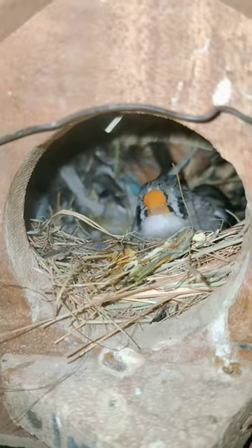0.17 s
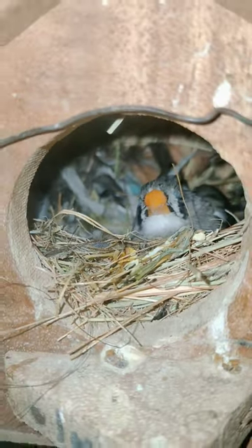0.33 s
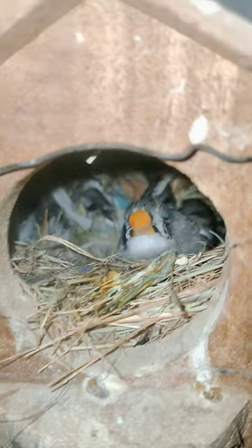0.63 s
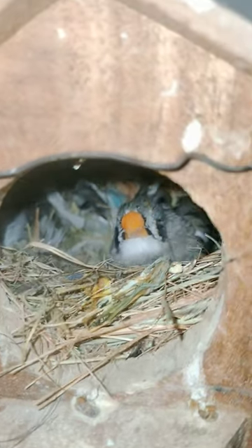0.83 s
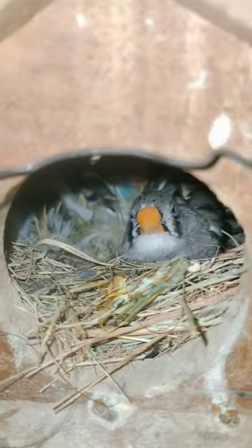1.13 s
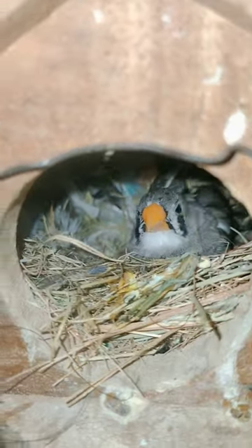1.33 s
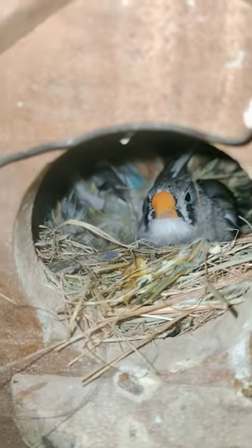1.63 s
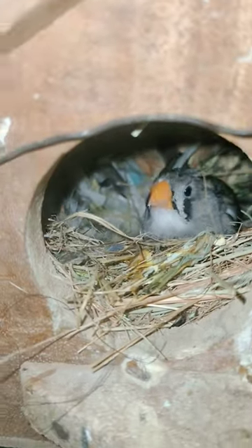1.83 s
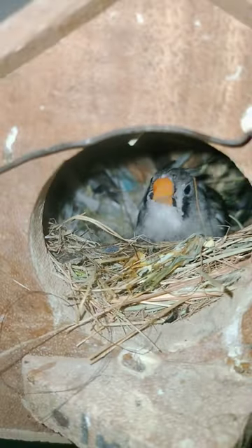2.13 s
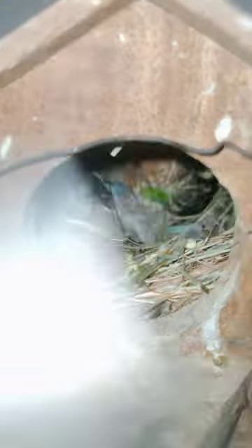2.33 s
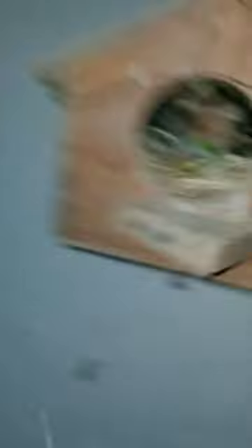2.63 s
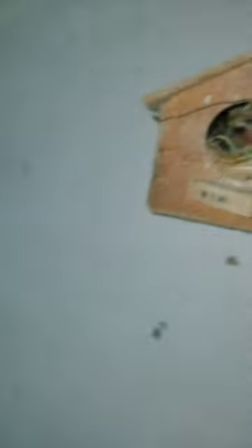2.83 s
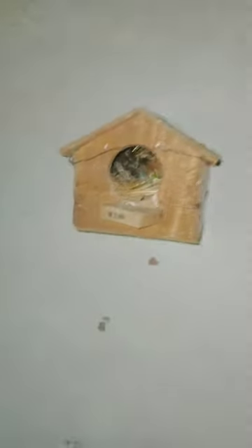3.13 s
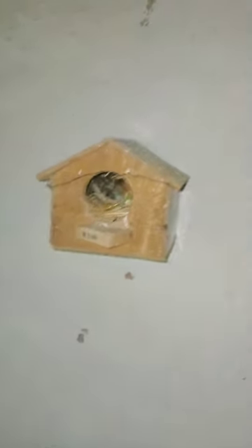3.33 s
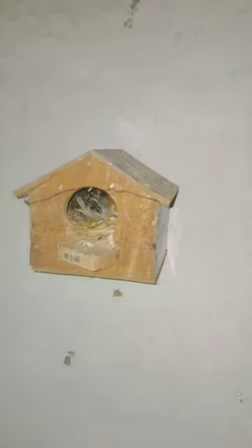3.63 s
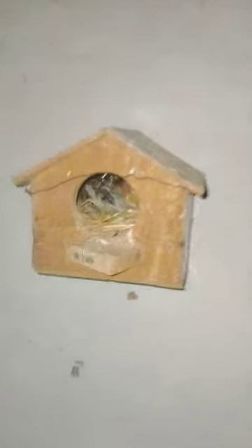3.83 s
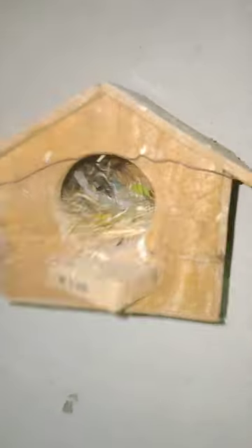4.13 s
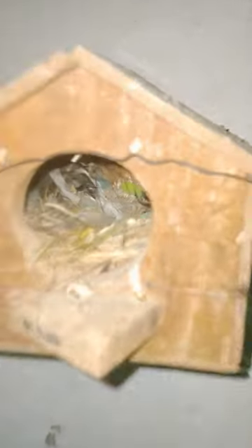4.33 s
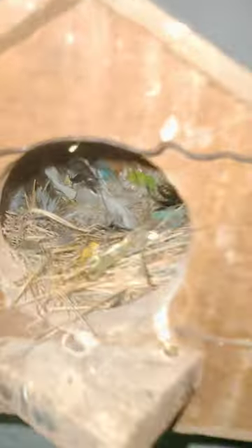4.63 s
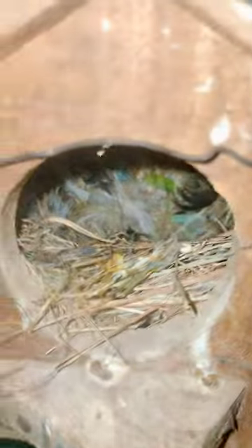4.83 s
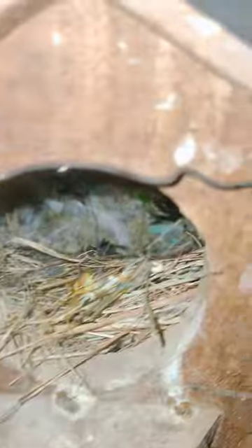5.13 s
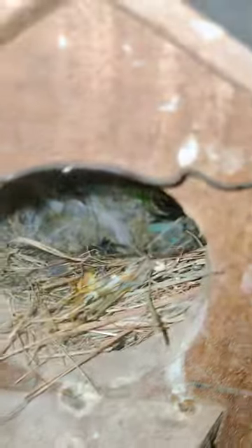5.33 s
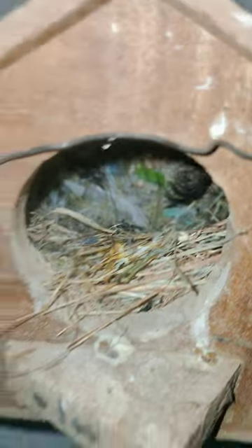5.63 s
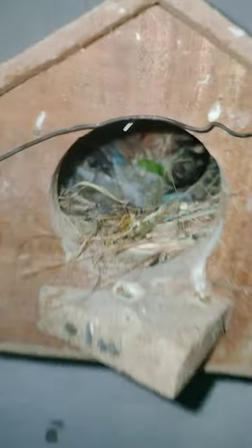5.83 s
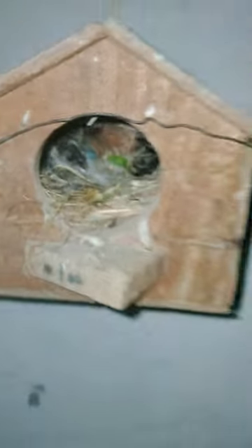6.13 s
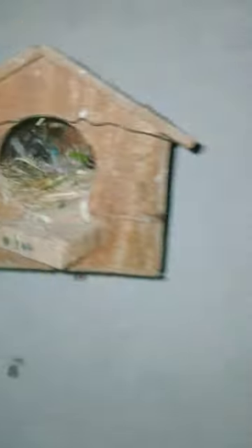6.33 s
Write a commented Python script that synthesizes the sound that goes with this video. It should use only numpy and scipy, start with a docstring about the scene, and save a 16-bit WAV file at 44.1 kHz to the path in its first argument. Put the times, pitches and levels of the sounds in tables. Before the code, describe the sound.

From the start, finches chirp close to the microphone in short, high, buzzy calls, about eight a second, with reedy chatter from other birds behind them. The hard walls of a small enclosure add a brief echo. A soft low puff of air comes near 0.9 seconds. At about 2.2 seconds there is one sharp knock, like claws striking a wooden nest box, with a few soft puffs, perhaps wingbeats, until 2.6 seconds. The close chirping stops around 2.8 seconds. From 3 seconds to the end at about 6.5 seconds, fainter birds keep up scattered chirps and short, hoarse, mostly falling whistles, with one louder close chirp near 3.9 seconds. Underneath runs a low outdoor rumble that eases in the second half, along with a faint high hiss and a few very faint low hums.

```python
"""Finches in a small enclosure

Close finches give buzzy chirps: the syrinx is the source and the resonances of the beak are the filter.
Further birds chatter and whistle hoarse glides, blurred by reflections from the hard walls.
A wooden knock and soft low puffs of air, perhaps from wings, sound over a low outdoor rumble."""
import sys
import numpy as np
from scipy import signal
from scipy.fft import rfft, irfft, next_fast_len
from scipy.io import wavfile
from scipy.ndimage import uniform_filter1d

SR = 44100
rng = np.random.default_rng(int(sys.argv[2]) if len(sys.argv) > 2 else 0)


def master(y):
    """Save y as 16-bit WAV."""
    cut = np.clip(np.atleast_2d(y).T, -1, 1)
    pcm = np.round(cut * 32767)  # scale
    wavfile.write(sys.argv[1], SR, pcm.astype(np.int16))


N = 286120


def gain_of(db):
    """Decibels to amplitude ratio."""
    return 10 ** (np.asarray(db) / 20)


def unit_rms(x):
    """Normalisation to unit mean power."""
    return x / np.sqrt(np.mean(x ** 2) + 1e-20)


def value_at(points, hz):
    """Interpolation on a logarithmic frequency axis."""
    f, value = np.transpose(points)
    return np.interp(np.log(hz + 1), np.log(f + 1), value)


def colour(x, points):
    """Zero-phase filtering by a curve of (Hz, dB) points."""
    size = next_fast_len(len(x))
    response = gain_of(value_at(points, np.fft.rfftfreq(size, 1 / SR)))
    return irfft(rfft(x, size) * response, size)[:len(x)]


def add(mix, start, sound):
    """Superposition of a sound at a start time in seconds."""
    part = mix[round(start * SR):][:len(sound)]
    part += sound[:len(part)]


def resonate(x, hz, width_hz):
    """A movable resonance by heterodyning: shift to zero frequency, smooth twice, shift back."""
    carrier = np.exp(2j * np.pi * np.cumsum(hz * np.ones(len(x))) / SR)
    r = np.exp(-np.pi * width_hz / SR)
    return 2 * (carrier * signal.lfilter([(1 - r) ** 2], [1, -2 * r, r * r], x / carrier)).real


def wobble(size, samples):
    """Low-pass noise: a smooth random drift of rms 1."""
    return unit_rms(uniform_filter1d(uniform_filter1d(rng.standard_normal(size), samples), samples))


def rumble():
    """Band-limited noise: three bands of outdoor rumble share an envelope and drift apart in level."""
    # Each row: frequency in Hz, relative level in dB.
    spectrum = [(12, -59), (20, -26.5), (50, -26.5), (100, -1), (160, 13.5), (260, -3.5), (430, 2),
                (700, -12.5), (1000, -13.5), (1500, -29.5)]
    # Each row: time in seconds, level in dB.
    envelope = [(0, -44), (.78, -37.5), (.99, -40), (1.99, -45.5), (2.6, -40.5), (2.95, -46), (3.79, -52.5),
                (4.73, -48.5), (4.93, -53), (6.07, -55.5), (6.49, -54)]
    # Low, middle and upper band. Each row: offset in dB, drift in dB per second.
    bands = [(3.5, -0.1), (2.5, 0.59), (-5, 0.66)]
    t, out = np.arange(N) / SR, np.zeros(N)
    noise = colour(rng.standard_normal(N), spectrum)
    level_db = np.interp(t, *np.transpose(envelope))
    for edges_hz, (db, drift) in zip([(15, 130), (130, 450), (450, 1100)], bands):
        band = signal.sosfilt(signal.butter(2, edges_hz, "bandpass", fs=SR, output="sos"), noise)
        out += gain_of(level_db + db + drift * t) * unit_rms(band)
    return out


def hum():
    """Exponential decay: faint, wavering low tones fade as they sound."""
    # Each row: start in seconds, length in seconds, frequency in Hz, level in dB.
    tones = [(1.1, 1, 106, -43), (2.78, 0.54, 195, -45), (4.3, 0.67, 106.4, -55), (0.552, .4, 429, -53),
             (1.621, .2, 384, -53), (4.15, .17, 609, -55), (4.919, 0.32, 240, -54)]
    out, fade_db = np.zeros(N), -12
    for start, length, hz, db in tones:
        t = np.arange(0, length, 1 / SR)
        pitch_hz = hz * (1 + .014 * wobble(len(t), 3000))
        tone = np.sqrt(2) * np.sin(2 * np.pi * np.cumsum(pitch_hz) / SR)
        add(out, start, gain_of(db + fade_db * t / length) * tone * signal.windows.tukey(len(t), .3))
    return out


def far_flock():
    """Incoherent summation: a far flock blurs into a steady hiss, made here as shaped noise."""
    # Each row: frequency in Hz, relative level in dB.
    spectrum = [(900, -55.5), (1500, 6), (3000, -0.5), (4300, -4.5), (5200, 23), (5800, 29), (6500, 24.5),
                (7400, 6), (8000, -20)]
    return gain_of(-56) * unit_rms(colour(rng.standard_normal(N), spectrum))


def walls(x):
    """Reverberation of the enclosure: four random decaying tails crossfade in turn so it stays smooth."""
    # Each row: frequency in Hz, time to decay by 60 dB in seconds.
    decay_times = [(500, 0.59), (1500, 0.16), (3000, 0.39), (5000, 0.36), (8000, 0.27)]
    cycle, out = 2 * np.pi * 1.2 * np.arange(N) / SR, np.zeros(N)
    for turn in range(4):
        taps = np.zeros(SR // 2)
        slots = np.arange(260, len(taps) - 20, 20)
        taps[slots + rng.integers(0, 20, len(slots))] = rng.choice([-1., 1.], len(slots))
        hz, t, bands = signal.stft(taps, SR, nperseg=256)
        decay = gain_of(-60 * t / value_at(decay_times, hz)[:, None])
        tail = signal.istft(bands * decay, SR, nperseg=256)[1]
        share = np.maximum(np.cos(cycle - turn * np.pi / 2), 0)
        out += signal.fftconvolve(x * share, tail / np.linalg.norm(tail))[:N]
    return out


def syrinx(hz, breath):
    """The voice source: periodic vibration gives a harmonic series, mixed with breath noise."""
    turns = np.cumsum(hz) / SR
    harmonics = sum(np.cos(2 * np.pi * k * turns) * (k * hz < 9000) for k in range(1, 16))
    return (1 - breath) * unit_rms(harmonics) + breath * rng.standard_normal(len(hz))


def chatter():
    """Source and filter: reedy calls too far to tell apart pass through one drifting beak resonance."""
    # Each row: time in seconds, vocal effort in dB.
    effort = [(0, -26.5), (.32, -41), (.96, -32.5), (1.15, -58), (1.25, -32.5), (1.82, -36), (2.09, -27),
              (2.22, -33.5), (2.491, -39), (2.73, -26.5), (3.07, -47.5), (3.36, -34), (3.962, -38.5),
              (4.19, -47), (4.41, -32), (4.84, -45.5), (5.1, -29), (5.4, -47.5), (5.96, -32.5),
              (6.49, -53.5)]
    effort_db = np.interp(np.arange(N) / SR, *np.transpose(effort))
    beak_hz = 2116 + 37.5 * (effort_db + 30.5)  # louder birds open wider
    source = syrinx(640 * (1 + .08 * wobble(N, 2500) + .01 * wobble(N, 200)), breath=.75)
    flutter_db = 3 * wobble(N, 900)
    return gain_of(effort_db + flutter_db) * unit_rms(resonate(source, beak_hz, 1520))


def whistle(length, db, first_hz, last_hz):
    """Jitter and shimmer: random modulation of pitch and level makes a breathy glide hoarse."""
    # Each row: first pitch of the note in Hz, level of its octave against the fundamental in dB.
    octave = [(1000, -10), (1300, 4.5), (1800, -18), (2500, -31.5), (3600, -3), (5000, -25)]
    size = int(length * SR)
    glide_hz = first_hz * (last_hz / first_hz) ** np.linspace(0, 1, size)
    hz = glide_hz * (1 + .027 * wobble(size, 200))
    phase = 2 * np.pi * np.cumsum(hz) / SR
    tone = np.sin(phase) + gain_of(value_at(octave, first_hz)) * np.sin(2 * phase)
    breath = unit_rms(resonate(rng.standard_normal(size), hz, 570))
    shimmer = gain_of(db + 3.6 * wobble(size, 150))
    return shimmer * (tone + .54 * breath) * signal.windows.tukey(size, .35)


def box_knocks():
    """Modal ringing: claws strike a wooden nest box and excite its damped modes."""
    # Each row: time in seconds, gain in dB.
    knocks = [(2.221, -7), (2.276, -34)]
    # Each row: frequency in Hz, relative level in dB, time to decay by 60 dB in seconds.
    modes = [(300, -26, .012), (1100, -15, .01), (2000, 0, .009), (3400, -12, .004), (4900, -5, .004),
             (6800, -8, .004)]
    # The small box radiates little bass. Each row: frequency in Hz, gain in dB.
    radiation = [(150, -24), (900, 0)]
    out, t, lead_s = np.zeros(N), np.arange(3000) / SR, .01
    ring = sum(gain_of(db - 60 * t / t60) * np.sin(2 * np.pi * hz * t) for hz, db, t60 in modes)
    knock = colour(np.pad(ring, (round(lead_s * SR), 0)), radiation)
    for start, db in knocks:
        add(out, start - lead_s, gain_of(db) * knock)
    return out


def air_puffs():
    """Air displacement: soft puffs of low noise reach the microphone, perhaps from wings."""
    # Each row: start in seconds, level in dB, length in seconds.
    puffs = [(.899, -37, 0.061), (2.234, -22, 0.0069), (2.329, -37, .019), (2.475, -33, 0.011),
             (2.512, -42, .015), (2.548, -47, 0.018), (2.615, -41, 0.034)]
    out = np.zeros(N)
    for start, db, length in puffs:
        size = int(length * SR)
        puff = unit_rms(resonate(rng.standard_normal(4000), hz=118, width_hz=200))
        add(out, start, gain_of(db) * puff[:size] * np.hanning(size))
    return out


def chirp(upper_db, lower_db, throat_db, length, buzz):
    """Source and filter: bursts from the syrinx run together as the opening beak raises its resonances."""
    t = np.arange(int(.2 * SR)) / SR
    nominal_hz = np.array([5860 * (1 + .0391 * buzz), 3268])  # buzzier calls ring higher
    upper_hz, lower_hz = nominal_hz * (1 + .023 * rng.standard_normal(2))  # birds differ a little
    source = syrinx(rng.uniform(640, 860) * (1 + .05574 * wobble(len(t), 83)), breath=.46)

    burst_hz = 155 * (1 + 5 * t + .03 * wobble(len(t), 200))
    bursts = np.cumsum(burst_hz) / SR
    closure = np.clip(.7 - 1.6 * np.cos(2 * np.pi * (bursts - .3)), 0, 1)
    puffs = 1 - buzz * np.exp(-(t / .04) ** 2) * closure
    swell = np.clip(t / (.33 * length), 0, 1)
    abruptness = buzz ** 4  # a buzzy call starts strongly, a smooth one swells from nothing

    opening = .94 + .087 * np.tanh(t / .027)
    flick = 1 - .065 * np.cos(2 * np.pi * bursts)  # each burst flicks upward
    dip = .3 * abruptness * np.exp(-t / .03)  # the lower resonance of a buzzy call starts low
    upper_path_hz = upper_hz * opening * flick
    upper = gain_of(upper_db) * unit_rms(resonate(source, upper_path_hz, 850))
    rasp = gain_of(throat_db + 1.5) * unit_rms(resonate(source, 4500, 1500))
    lower = gain_of(lower_db) * unit_rms(resonate(source, lower_hz * (opening - dip), 1100))
    tone_hz = upper_path_hz * (1 + .024 * wobble(len(t), 60))  # buzzy calls also whistle here
    tone = 1.3 * abruptness * gain_of(upper_db) * np.sin(2 * np.pi * np.cumsum(tone_hz) / SR)
    # Neighbouring resonances alternate in sign, so no notch opens between them.
    beak = (upper - rasp + lower + tone) * (abruptness + (1 - abruptness) * swell)
    throat_hz = rng.uniform(1720, 1750) * (1 + .14 * np.exp(-t / .03))  # sinks as the throat swells
    throat = gain_of(throat_db + 1) * unit_rms(resonate(source, throat_hz, 690)) * swell ** .68

    attack = np.minimum(t / .001, 1)
    release = gain_of(-1250 * np.maximum(t - length, 0))
    return puffs * attack * release * (beak - throat)


def scene():
    """Direct and reverberant sound: fainter, further birds arrive more by way of the walls."""
    # Close calls. Each row: start in seconds, relative levels of the upper, lower and throat
    # resonances in dB, length before the release in seconds, buzz from 0 to 1.
    chirps = [(0.105, -16.5, -23.5, -26.5, 0.046, .7), (0.123, -10, -21, -44, 0.033, 0.86),
              (0.238, -9.5, -17, -33, 0.04, 0.63), (0.3553, -10, -17.5, -23.5, 0.049, 0.52),
              (0.494, -9.5, -17.5, -32, 0.035, 0.9), (0.533, -12.5, -18, -20.5, 0.031, 0.16),
              (0.654, -20.5, -22, -27.5, 0.023, 0.43), (0.6924, -11.5, -19, -19.5, 0.043, 0),
              (0.8254, -6.5, -18.5, -21.5, 0.011, 0.58), (0.914, -8, -13.5, -29, 0.03, 0.89),
              (1.035, -16.5, -8.5, -43, 0.023, 0.63), (1.082, -13, -10, -15.5, 0.034, 0.5),
              (1.253, -14.5, -13, -18.5, 0.038, 0.3), (1.374, -29.5, -15, -29.5, 0.046, 0.86),
              (1.4252, -13.5, -13.5, -20, 0.04, 0.05), (1.6037, -8.5, -13, -26, 0.025, 0.5),
              (1.704, -8.5, -13.5, -26.5, 0.031, 0.65), (1.8675, -18.5, -15, -23.5, 0.057, 0.45),
              (1.981, -31, -24, -34, 0.074, 0), (2.054, -16.5, -17.5, -22, 0.041, 0),
              (2.23, -19.5, -20.5, -27.5, 0.027, 0.03), (2.345, -31, -23.5, -35, 0.05, 0.55),
              (2.399, -13, -15, -22.5, 0.031, 0.22), (2.5646, -15, -16.5, -22, 0.039, 0.23),
              (2.6864, -27.5, -20.5, -34, .052, 0.5), (2.7393, -20, -11.5, -22, .038, .35),
              (2.981, -43.5, -37.5, -39, 0.074, .35), (3.145, -39, -40, -41, .06, 0),
              (3.2984, -35.5, -31, -40, 0.051, .35), (3.455, -36.5, -34, -35.5, 0.045, 0.44),
              (3.6226, -34.5, -38, -37, 0.022, .35), (3.663, -34.5, -28.5, -41, 0.043, 0),
              (3.771, -37, -37, -38, 0.072, .35), (3.86, -12, -24.5, -28, 0.047, 0.77),
              (4.08, -28, -40, -35, 0.038, 0.75), (4.13, -26, -33.5, -32.5, 0.037, 0.1),
              (4.257, -30, -32, -41.5, 0.045, 0.3), (4.383, -34, -26, -57, 0.025, 0.7),
              (4.405, -25, -24.5, -65, .027, .35), (4.765, -41, -34.5, -42.5, 0.042, 0.25),
              (4.892, -34, -23, -36, 0.028, 0.5), (4.976, -38, -37, -37, 0.045, 0.2),
              (5.099, -35, -29.5, -48, 0.031, 0.1), (5.143, -24.5, -38, -40, .02, 0.4),
              (5.617, -47, -34.5, -73, .036, 0.56), (5.686, -27, -28, -47, 0.082, 0),
              (5.785, -27, -44, -34, 0.02, 0.2), (5.862, -30, -53, -43, 0.048, 0),
              (5.987, -30, -32.5, -44, 0.029, 0.03), (6.225, -31, -37, -39.5, 0.014, 0.44),
              (6.338, -26, -29.5, -64, 0.061, 0.9), (6.454, -27, -31.5, -39, 0.028, 0.2)]
    # Further birds, and the short falling squeaks near 5 kHz that open some close calls. Each row: start and
    # length in seconds, level in dB, first and last pitch in Hz.
    glides = [(0, 0.064, -37, 2100, 2500), (.06, .07, -38, 2700, 2014), (0.949, 0.035, -33, 3300, 3600),
              (1.052, 0.028, -26, 2630, 4050), (1.171, 0.062, -40.5, 1930, 1318),
              (1.525, 0.094, -44, 2600, 2000), (1.865, 0.058, -44, 1636, 1133),
              (2.005, .082, -32.5, 3060, 3130), (2.1, 0.075, -40.5, 1724, 1480),
              (2.702, 0.061, -48, 990, 934), (2.974, 0.041, -45, 4800, 3960),
              (3.134, 0.043, -41.5, 4800, 4060), (3.286, 0.044, -45, 4970, 4000),
              (3.31, .072, -34.5, 1973, 1988), (3.322, 0.072, -38.5, 2963, 3270),
              (3.439, .04, -49, 5170, 4040), (3.45, 0.14, -39.5, 1750, 1270),
              (3.611, 0.036, -46, 4940, 4050), (3.625, 0.097, -33.5, 1850, 1797),
              (3.681, .12, -33.5, 3005, 1794), (3.807, 0.075, -37, 2060, 1944),
              (3.955, 0.085, -42, 1240, 1594), (4.012, 0.14, -30, 2903, 1706),
              (4.3, 0.1, -42.5, 1303, 1299), (4.38, 0.16, -36, 3723, 2980),
              (4.414, 0.17, -37.5, 2594, 1362), (4.425, .07, -37, 5400, 4980),
              (4.439, 0.082, -38, 6660, 5860), (4.5, 0.0505, -41.5, 1754, 1306),
              (4.547, .11, -40, 1287, 1199), (4.627, .14, -35, 2224, 1753),
              (4.742, 0.11, -42.5, 1860, 2000), (4.846, 0.054, -28, 3120, 2730),
              (4.891, 0.046, -29.5, 2300, 1745), (4.949, .06, -35.5, 1885, 1590),
              (4.938, 0.052, -48, 980, 835), (4.92, 0.12, -54, 668, 616), (5.066, 0.028, -38, 2270, 2000),
              (5.038, .29, -51, 1206, 1430), (5.099, 0.17, -37.5, 3702, 2735),
              (5.141, 0.089, -32, 5210, 6690), (5.236, 0.076, -36, 2200, 1446),
              (5.377, 0.039, -36.5, 2367, 1844), (5.693, 0.071, -41, 3670, 3600),
              (5.741, 0.2, -41.5, 3270, 3265), (5.84, 0.05, -41, 2350, 2340), (5.789, .11, -46.5, 898, 971),
              (6.015, 0.073, -46, 980, 996), (6.089, .1, -43.5, 1500, 1038),
              (6.109, 0.033, -36, 2630, 2495), (6.134, 0.071, -34.5, 2118, 1960),
              (6.196, 0.11, -40, 2450, 1906), (6.344, 0.053, -35, 3610, 3530),
              (6.365, .11, -38.5, 2022, 2180), (6.385, 0.1, -35, 5570, 6420)]
    # A finch is too small to radiate bass. Each row: frequency in Hz, gain in dB.
    radiation = [(200, -76.5), (600, -41.5), (950, -10.5), (1400, -7.5), (9000, -7)]
    near, to_walls, notes = np.zeros((3, N))
    knocks_and_puffs = box_knocks() + air_puffs()
    for start, *call in chirps:
        sound = chirp(*call)
        faintness_db = np.clip(-10 * np.log10(np.mean(sound ** 2)) - 25, 0, 30)
        add(near, start, sound)
        add(to_walls, start, sound * gain_of(-5.5 + .24 * faintness_db))
    for start, *note in glides:
        add(notes, start, whistle(*note))
    blur = colour(chatter(), radiation)
    direct = colour(near, radiation) + notes + blur + knocks_and_puffs
    incident = colour(to_walls, radiation) + gain_of(-3) * notes + blur + gain_of(-13) * knocks_and_puffs
    return (direct + walls(incident) + rumble() + far_flock() + hum())[None]


def record(dry):
    """Band limiting and saturation: the top is lost, peaks round off, faint treble sidebands lie above."""
    # Microphone bass and middle, microphone treble, low-pass after saturation, sideband filter.
    # Each row: frequency in Hz, gain in dB.
    mic_low = [(15, -10), (70, 0), (6000, 0)]
    mic_high = [(7000, 4.5), (7600, 8), (8000, -7.5), (8500, -13)]
    low_pass = [(20, 0), (8200, 0), (8700, -40), (22050, -60)]
    sideband_filter = [(7900, -73.5), (8600, -39), (10300, -37.5), (12000, -40), (12600, -67.5),
                       (14200, -44), (15400, -66.5)]
    ceiling, shift_hz, cutoff_hz = .7, 4000, 15700
    rounded = ceiling * np.tanh(colour(dry[0], mic_low + mic_high) / ceiling)
    band = colour(rounded, low_pass)
    treble = signal.sosfilt(signal.butter(8, shift_hz, "highpass", fs=SR, output="sos"), band)
    phase = 2 * np.pi * shift_hz * np.arange(N) / SR
    sidebands = colour(2 * treble * (np.cos(phase) + np.cos(2 * phase)), sideband_filter)
    edge = signal.firwin(511, cutoff_hz, window=("kaiser", 9), fs=SR)
    return signal.oaconvolve(band + sidebands, edge, "same")[None]


dry = scene()
out = record(dry)
master(out)
```